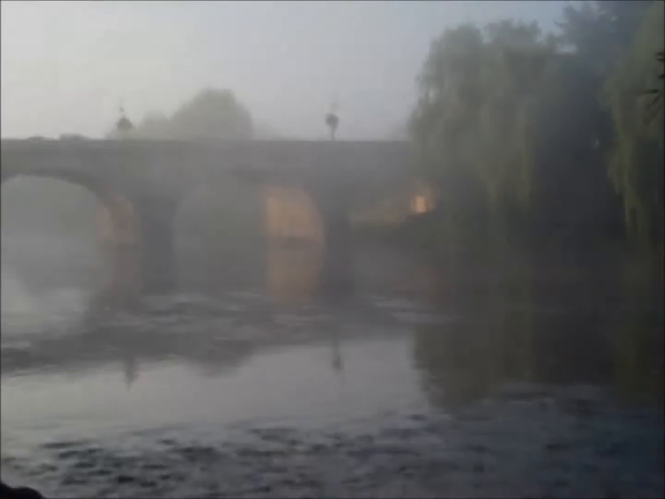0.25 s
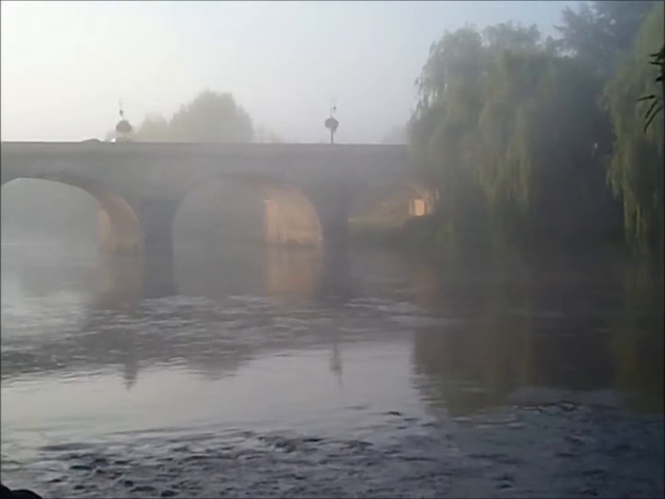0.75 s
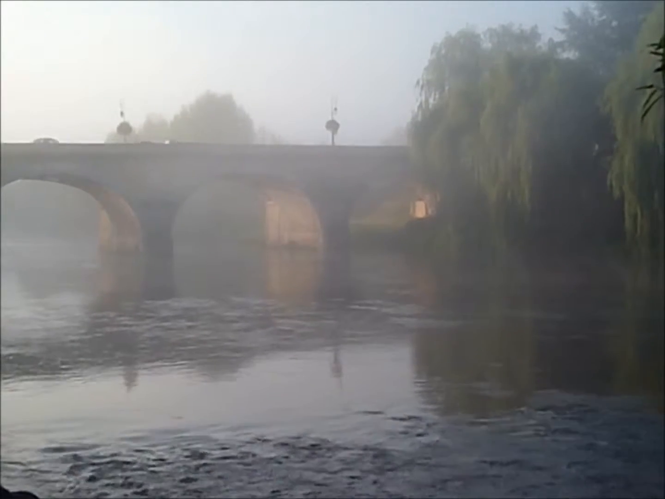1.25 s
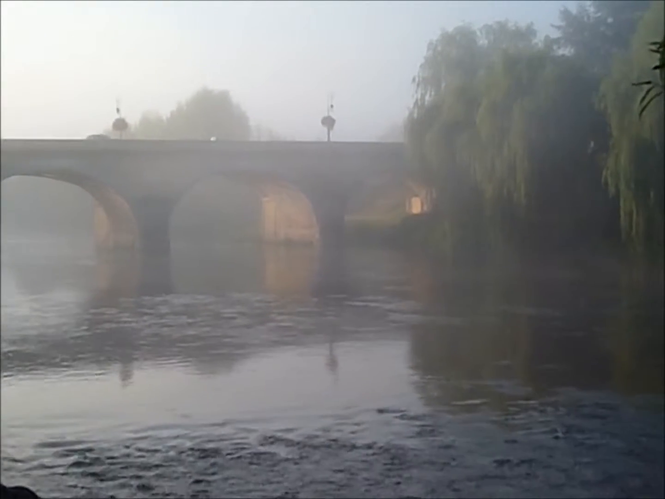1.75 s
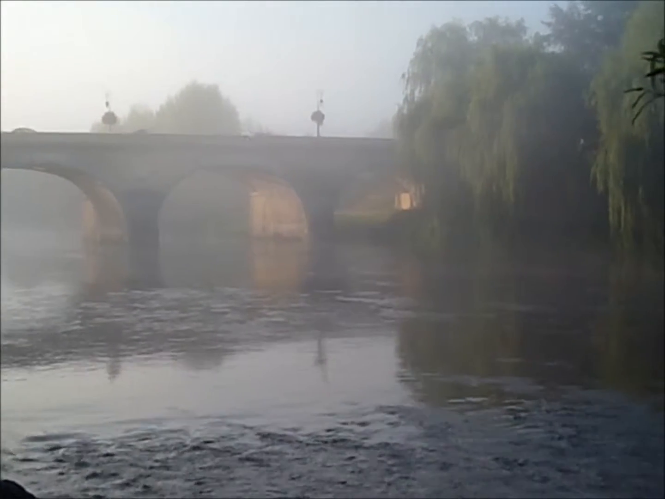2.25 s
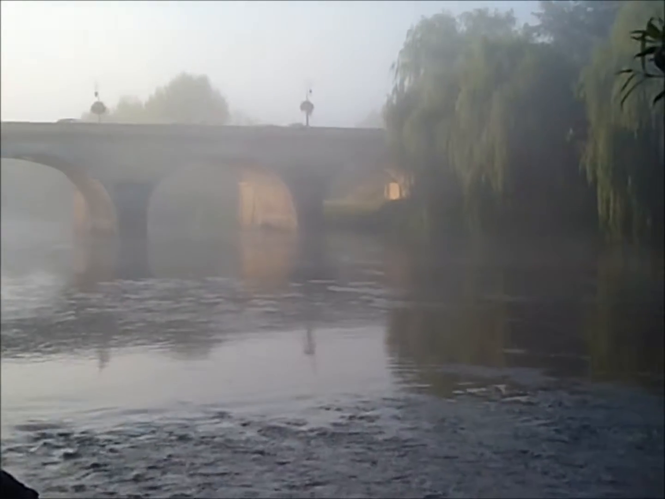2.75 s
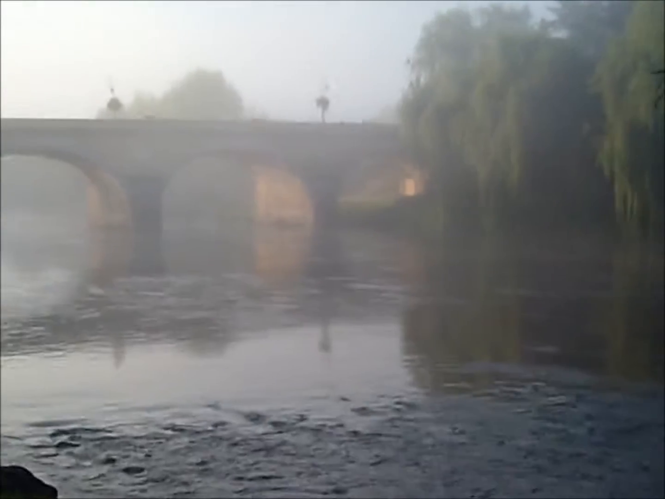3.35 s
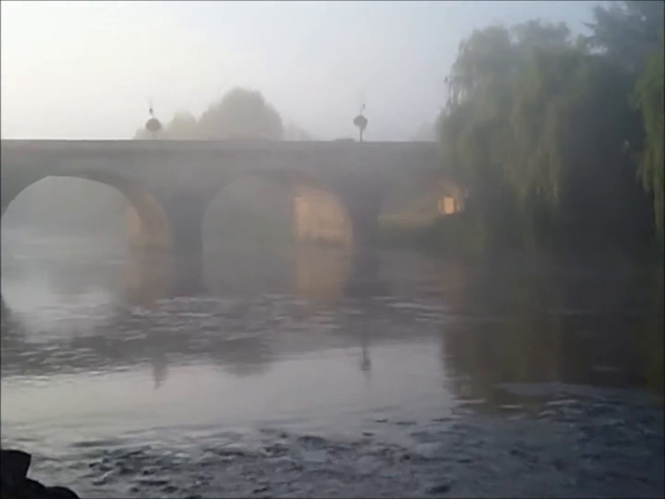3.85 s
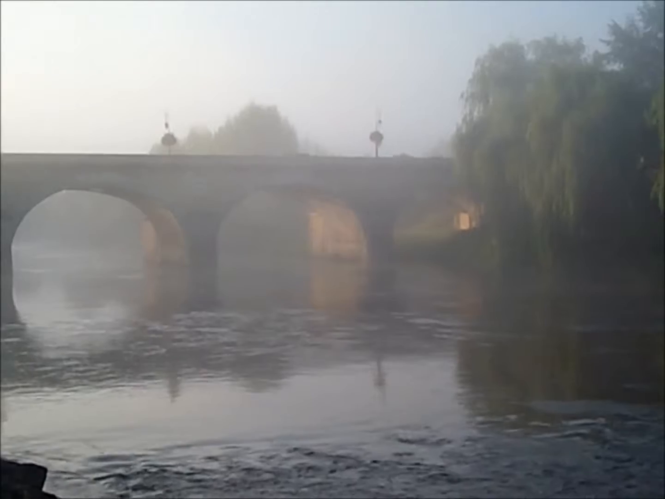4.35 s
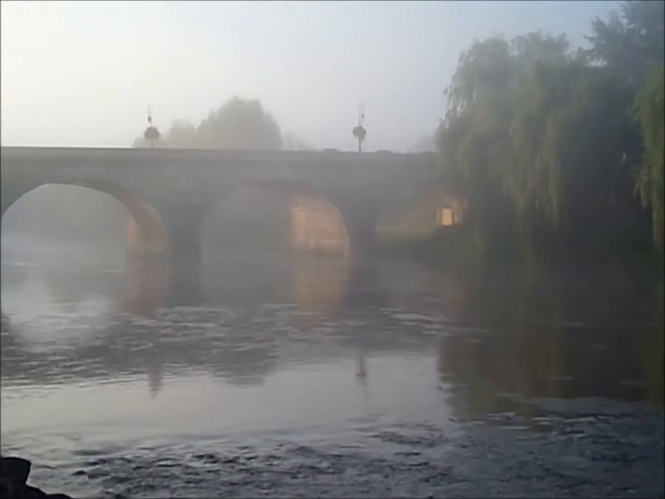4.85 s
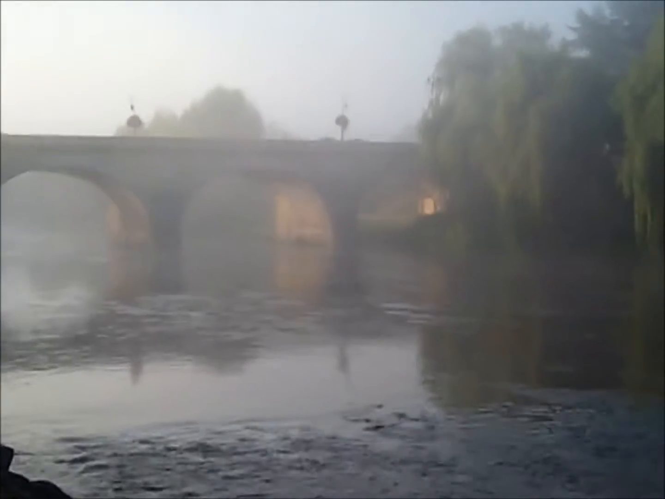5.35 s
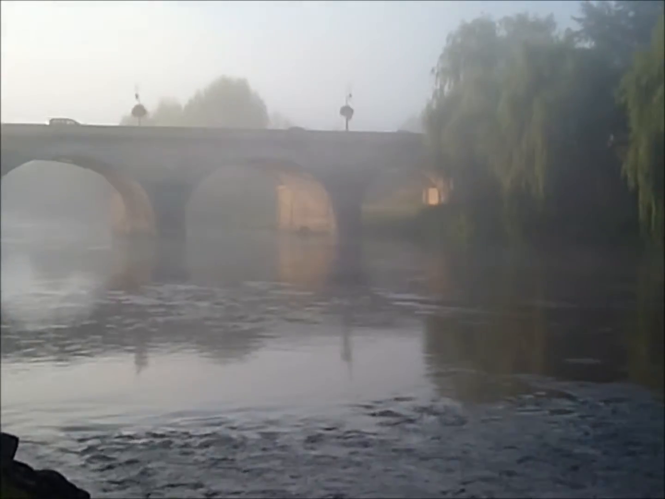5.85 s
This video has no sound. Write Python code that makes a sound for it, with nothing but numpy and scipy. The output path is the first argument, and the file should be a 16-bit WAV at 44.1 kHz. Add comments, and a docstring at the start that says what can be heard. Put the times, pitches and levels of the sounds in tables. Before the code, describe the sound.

A shallow river rushes over stones from the first moment, a dense, steady hiss made of fine turbulence and countless tiny bubbles, full in the middle and treble with very little bass. It rises slightly to its fullest around 1.3 s, surging briefly near 1, 1.8 and 2.9 s. Small bubbles plop at irregular moments throughout, a cluster near 1.05 s, others around 0.4, 1.5, 2.6, 3.3, 4.3 and 5 s. Bright watery gurgles slide upward around 1.2, 1.9 and 2.9 s; lower, hollow ones follow near 3.2, 4.5 and 5.4 s. From about 3.7 s the water grows thinner and quieter, losing its body, then its topmost treble, and fades faster after 5.4 s. Extremely faint distant traffic drones under it. The small stereo camera on the riverbank adds weak high whining tones and thin hiss.

```python
"""Below a bridge a shallow river rushes over stones, heard from the bank through a small camera.
Noise and countless ringing bubbles merge into a hiss; single bubbles plop, and sliding noise bands gurgle.
Gliding sines drone as far traffic over a low noise rumble; the camera adds paired tones and a thin hiss.
Water and camera noise rise in one broad arch and fade, the rumble less so; notches cut the treble."""
import sys
import numpy as np
from scipy import signal
from scipy.fft import rfft, irfft
from scipy.io import wavfile
from scipy.ndimage import uniform_filter1d

SR = 44100
rng = np.random.default_rng(int(sys.argv[2]) if len(sys.argv) > 2 else 0)


def wav_out(sig):
    """Save sig, one row per channel (or a flat mono array), as 16-bit PCM at SR to the path in sys.argv[1]."""
    wavfile.write(sys.argv[1], SR, np.round(np.clip(np.atleast_2d(sig).T, -1, 1) * 32767).astype(np.int16))


N = 269010


def gain_of(db):
    """Level law: 20 dB is a tenfold amplitude."""
    return 10 ** (np.asarray(db) / 20)


def evened(x):
    """Normalisation to unit rms."""
    return x / np.sqrt(np.mean(x ** 2) + 1e-20)


def read(points, hz):
    """Linear interpolation of a spectrum on a log-frequency axis."""
    f, value = np.transpose(points)
    return np.interp(np.log(hz + 1), np.log(f + 1), value)


def panned(balance_db):
    """Level difference between channels, split evenly into left and right gains."""
    return np.array([gain_of(balance_db / 2), gain_of(-balance_db / 2)]).reshape(2, -1)


def wander(rate_hz):
    """Low-passed noise: a smooth random curve of rms 1 that moves at about this rate."""
    hz = np.fft.rfftfreq(N, 1 / SR)
    smooth = rfft(rng.standard_normal(N)) * np.exp(-(hz / rate_hz) ** 2)
    return evened(irfft(smooth, N))


def ports(common, other, colour_db):
    """Spatial coherence: two closely spaced microphone ports are alike to a degree set by frequency."""
    # likeness of the ports: (frequency [Hz], coherence)
    coherence = [(30, 0.7), (120, 0.92), (400, 0.97), (1000, 0.96), (2200, 0.91), (4000, 0.77),
                 (5400, 0.61), (7000, 0.28), (10000, 0.068)]
    # level difference of the ports: (frequency [Hz], left minus right [dB])
    balance = [(50, 0.5), (250, 0.5), (850, 2), (1350, 1), (2500, 1.5), (4000, 2), (5800, 1.5), (6500, 6.5),
               (9000, 3.5)]
    # phase difference of the ports: (frequency [Hz], lead of the left [rad])
    lead = [(200, 0.092), (700, 0.024), (3500, 0.14), (5300, 0.11), (7000, -0.72), (8200, -0.11)]
    hz = np.fft.rfftfreq(N, 1 / SR)
    same = np.clip(read(coherence, hz), -1, 1)
    left = rfft(common)
    blend = same * left + np.sqrt(1 - same ** 2) * rfft(other)
    right = blend * np.exp(-1j * read(lead, hz))
    spectra = np.array([left, right]) * panned(read(balance, hz)) * gain_of(colour_db)
    return evened(irfft(spectra, N))


def bubble(hz, decay, rise=0.018, start_cycles=1.0):
    """Bubble resonance: trapped air starts softly and rings down, its pitch rising near the surface."""
    age = np.arange(int(6 * decay * SR) + 2) / (decay * SR)  # in decay times
    turns = hz * decay * (age + rise * age ** 2 / 2)
    onset = 1 - np.exp(-(turns / start_cycles) ** 2)
    return onset * np.exp(-age) * np.sin(2 * np.pi * turns)


def fizz(count=40, size_db=3.0, cycles=7):
    """Superposition of random bubbles: each size bursts forth at random moments, a few much louder."""
    bubbles_per_s = 2500  # all sizes together
    out = np.zeros(N)
    for hz in np.geomspace(700, 9000, count) * rng.uniform(.96, 1.04, count):
        at, size = rng.random((int(bubbles_per_s * N / SR / count), 2)).T
        # exponentially spread levels, capped
        burst_db = size_db * np.minimum(-np.log(1 - size), 5)
        train = np.bincount((at * N).astype(int), gain_of(burst_db), N)
        ring = bubble(hz, cycles / hz)
        out += np.sqrt(hz) * evened(signal.oaconvolve(train, ring)[:N])
    return evened(out)


def churn(x, patchy_db=0.27, patch_s=0.07, patch_hz=500):
    """Turbulent modulation: patches of time and frequency flicker in level."""
    hz, t, z = signal.stft(x, SR, nperseg=1024, noverlap=768)
    noise = rng.standard_normal((len(t), len(hz)))
    patches = uniform_filter1d(noise, max(1, int(patch_s / t[1])), axis=0)
    patches = uniform_filter1d(patches, max(1, int(patch_hz / hz[1])), axis=1)
    field_db = patchy_db * evened(patches).T
    return signal.istft(z * gain_of(field_db), SR, nperseg=1024, noverlap=768)[1][:, :N]


def river():
    """Broadband flow noise: the far wash of the shallows plus nearer bubbles, dull at the very top."""
    # colouring filter of the water: (frequency [Hz], gain [dB])
    rush = [(30, -48), (100, -24), (170, -20), (330, -12.5), (450, -10.5), (570, -8.5), (660, -4.5),
            (800, -1.5), (960, 1), (1220, -1.23), (1600, 0.6), (2050, -1.63), (2600, -0.5), (4000, 0.5),
            (5300, -1), (6600, -10.5), (9100, -21.5)]
    treble_db_per_octave = -62  # added slope above the last table row
    bubbles_db = -11.5  # fizz relative to the wash
    rush_db = 3.5  # relative to the loudness curve
    hz = np.fft.rfftfreq(N, 1 / SR)
    octaves_above = np.log2(np.maximum(hz / rush[-1][0], 1))
    colour_db = read(rush, hz) + treble_db_per_octave * octaves_above
    wash = rng.standard_normal((2, N))
    water = wash + gain_of(bubbles_db) * np.array([fizz(), fizz()])
    return gain_of(rush_db) * churn(ports(*water, colour_db))


def whine(twin_db=-2, wander_hz=1.62):
    """Beating: electronic tones in pairs one frame rate apart, their pitch wandering slightly."""
    # lower tone of each pair in the camera's electronics: (frequency [Hz])
    tones_hz = [3296, 4496, 4796, 5244, 6144, 6893, 7343, 7792, 8991, 10639]
    # for each tone: (level relative to the loudness curve [dB], left minus right [dB])
    tone_levels = [(-32, -8), (-25, -10), (-29, -8), (-31, -8), (-28.5, -1), (-37, 0), (-34, 9), (-30, 3),
                   (-32, 12), (-51, 6)]
    frame_hz = 30
    t, out = np.arange(N) / SR, np.zeros((2, N))
    slow = evened(uniform_filter1d(rng.standard_normal(N), size=4000))
    drift = np.cumsum(wander_hz * slow) / SR  # in cycles
    for hz, (db, balance_db) in zip(tones_hz, tone_levels):
        tone = np.sin(2 * np.pi * (hz * t + drift + rng.random()))
        twin = np.sin(2 * np.pi * ((hz + frame_hz) * t + drift + rng.random()))
        pair = tone + gain_of(twin_db) * twin
        out += np.sqrt(2) * gain_of(db) * panned(balance_db) * pair  # sqrt(2): rms to peak
    return out


def thin_hiss():
    """Band-passed noise: a narrow band of electronic hiss high in the treble."""
    # (centre [Hz], half width [Hz], level relative to the loudness curve [dB], left minus right [dB])
    hiss_band = (10732, 212, -36.5, 4.5)
    centre_hz, width_hz, db, balance_db = hiss_band
    hz = np.fft.rfftfreq(N, 1 / SR)
    band = np.exp(-.5 * ((hz - centre_hz) / width_hz) ** 2)
    hiss = irfft(rfft(rng.standard_normal((2, N))) * band, N)
    return gain_of(db) * panned(balance_db) * evened(hiss)


def rumble():
    """Filtered noise: the faint low sound of the open air and the far town."""
    # colouring filter of the rumble: (frequency [Hz], gain [dB])
    rumble_colour = [(15, -9), (42, -4), (53, 3), (66, 0), (77, 2.5), (92, -8), (200, -17), (1000, -90)]
    rumble_db = -91.5  # where the loudness curve is highest
    colour_db = read(rumble_colour, np.fft.rfftfreq(N, 1 / SR))
    return gain_of(rumble_db) * ports(*rng.standard_normal((2, N)), colour_db)


def loudness():
    """Amplitude envelope: a quick rise, one broad arch over its crest and a final fade."""
    crest_s, crest_db, arch_db_per_s2 = 1.35, -48.5, 0.4459
    rise_db, rise_s = 1.5, 0.21
    fade_from_s, fade_db_per_s = 5.42, 4
    t = np.arange(N) / SR
    rise = rise_db * np.exp(-t / rise_s)
    arch = arch_db_per_s2 * (t - crest_s) ** 2
    fade = fade_db_per_s * np.maximum(t - fade_from_s, 0)
    return gain_of(crest_db - rise - arch - fade)


def plops():
    """Isolated bubble resonances: single bubbles, small and large, heard apart from the rush."""
    # (start [s], amplitude before onset, decay and panning [dB], starting pitch [Hz], decay time [cycles])
    plop_table = [(0.118, -47, 7060, 12), (0.379, -40.5, 2220, 9), (0.445, -44.5, 1900, 8),
                  (1.040, -38, 1760, 9), (1.043, -44.5, 754, 4.4), (1.053, -39, 2110, 6.5),
                  (1.478, -39, 1700, 7), (1.750, -44, 860, 4.3), (1.914, -42, 6860, 6.8),
                  (2.234, -46.5, 690, 4), (2.569, -41, 2000, 6), (2.879, -42, 1380, 6),
                  (3.268, -41, 2920, 13), (3.871, -43, 1720, 7), (3.960, -44, 3420, 10),
                  (4.255, -40, 4100, 10), (4.807, -44, 1400, 6), (5.049, -42, 2920, 13),
                  (5.209, -43, 3930, 10), (5.398, -44, 1890, 7), (5.612, -53, 710, 6)]
    out = np.zeros(N)
    for s, db, hz, cycles in plop_table:
        ring = gain_of(db) * bubble(hz, cycles / hz)
        start = round(s * SR)
        out[start:start + len(ring)] += ring
    return out * panned(1.5)  # slightly left


def drones(waver_hz=2.18):
    """Frequency modulation: low engine notes of distant traffic come and go, gliding and wavering."""
    # (time of the top [s], level there [dB], pitch there [Hz], half length [s], glide [Hz/s])
    drone_table = [(0.74, -88.5, 76, 0.17, 2), (2.05, -92, 68, .2, 8), (2.85, -90, 80, .45, 11),
                   (2.63, -90.5, 53, 0.18, 0), (3.8, -92, 77.9, 0.24, -10), (4.95, -92, 56, .3, -3)]
    t, out = np.arange(N) / SR, np.zeros(N)
    for s, db, pitch_hz, length, glide in drone_table:
        turns = np.cumsum(pitch_hz + glide * (t - s) + waver_hz * wander(4)) / SR
        envelope = np.exp(-.5 * ((t - s) / length) ** 2)
        out += np.sqrt(2) * gain_of(db) * envelope * np.sin(2 * np.pi * turns)
    return out


def swells(gurgle_hz=18, gurgle_db=0.4, waver_hz=35):
    """Narrow-band noise, modulated: hollow notes grow and sink, gurgling in level and pitch as they slide."""
    # (time of the top [s], level there [dB], pitch there [Hz], half length [s], glide [Hz/s], half width [Hz])
    swell_table = [(1.241, -57.5, 2420, 0.14, 1198, 220), (1.80, -56, 3400, 0.039, 0, 220),
                   (1.898, -54.5, 4200, 0.17, 602, 230), (2.89, -53.5, 4080, 0.2, 897, 160),
                   (3.151, -59, 990, .26, -100, 190), (4.54, -59.5, 1560, 0.28, -400, 180),
                   (4.65, -68, 670, 0.24, 0.5, 150), (5.37, -62, 1010, 0.25, -60, 150),
                   (5.82, -67.5, 1650, .14, 3, 220)]
    t, hz, out = np.arange(N) / SR, np.fft.rfftfreq(N, 1 / SR), np.zeros((2, N))
    noise = rfft(ports(*rng.standard_normal((2, N)), 0))
    level_gurgle = gain_of(gurgle_db * wander(gurgle_hz))
    waver_turns = np.cumsum(waver_hz * wander(gurgle_hz)) / SR
    gurgle = level_gurgle * np.exp(2j * np.pi * waver_turns)
    for s, db, pitch_hz, length, glide, width_hz in swell_table:
        # positive frequencies alone, so that a rotating phase shifts the pitch
        band = np.fft.ifft(noise * np.exp(-.5 * ((hz - pitch_hz) / width_hz) ** 2), N)
        slide = np.exp(1j * np.pi * glide * (t - s) ** 2)
        note = (band * gurgle * slide).real
        out += gain_of(db) * np.exp(-.5 * ((t - s) / length) ** 2) * evened(note)
    return out


def current():
    """Amplitude modulation of the water alone: the whole current surges briefly now and then."""
    # (time of the top [s], rise [dB])
    surges = [(1.05, 0.41), (1.79, 0.77), (2.9, 0.84)]
    surge_s = 0.087  # half length
    t = np.arange(N) / SR
    return gain_of(sum(db * np.exp(-.5 * ((t - s) / surge_s) ** 2) for s, db in surges))


def thinned(x):
    """Time-varying low shelf: the low body of the rush dies away sooner than its hiss."""
    body_hz, body_from_s, body_fade_db_per_s = 520, 3.7, 0.24
    t, hz = np.arange(N) / SR, np.fft.rfftfreq(N, 1 / SR)
    body = irfft(rfft(x) / (1 + (hz / body_hz) ** 8), N)
    fade = gain_of(-body_fade_db_per_s * np.maximum(t - body_from_s, 0))
    return x + body * (fade - 1)


def dulled(x):
    """Time-varying high shelf: everything above about 9.8 kHz fades faster from 4.6 s."""
    top_hz, top_from_s, top_fade_db_per_s = 9800, 4.6, 14
    t, hz = np.arange(N) / SR, np.fft.rfftfreq(N, 1 / SR)
    top = x - irfft(rfft(x) / (1 + (hz / top_hz) ** 40), N)
    fade = gain_of(-top_fade_db_per_s * np.maximum(t - top_from_s, 0))
    return x + top * (fade - 1)


def scene(rumble_fade=0.46):
    """Superposition: water and camera noise rise and fade together; the rumble fades less."""
    level = loudness()
    water = current() * thinned(river())
    steady = level * dulled(water + whine() + thin_hiss())
    rumble_level = (level / level.max()) ** rumble_fade
    return steady + swells() + plops() + drones() + rumble() * rumble_level


def record(dry):
    """Linear filtering: the camera's narrow treble notches, then its band limit."""
    # (centre [Hz], half width [Hz], gain at the centre [dB])
    notches = [(4517, 227, -17.5), (4906, 234, -24), (5696, 260, -16.5), (6064, 323, -19.5)]
    edge_hz = 11450
    hz = np.fft.rfftfreq(N, 1 / SR)
    response = np.ones(len(hz), complex)
    for centre_hz, width_hz, depth_db in notches:
        offset = 1j * (hz - centre_hz) / width_hz
        response = response * (gain_of(depth_db) + offset) / (1 + offset)
    notched = irfft(rfft(dry) * response, N)
    low_pass = signal.firwin(511, edge_hz, window=("kaiser", 9), fs=SR)
    return signal.oaconvolve(notched, low_pass[None], "same")


dry = scene()
out = record(dry)
wav_out(out)
```